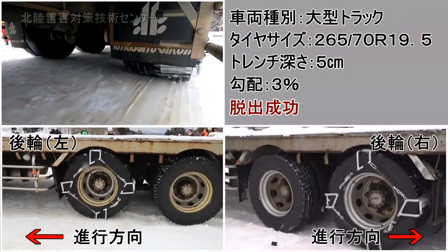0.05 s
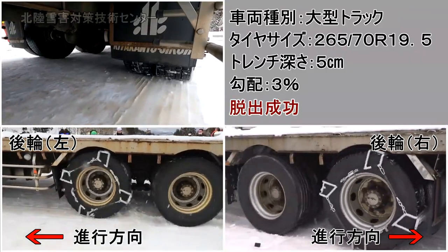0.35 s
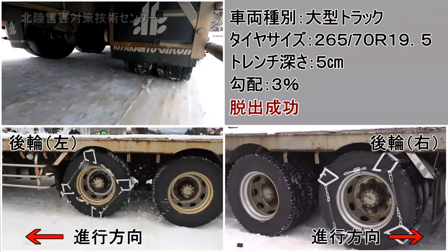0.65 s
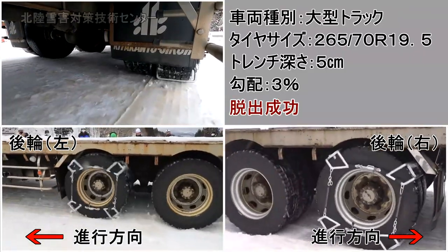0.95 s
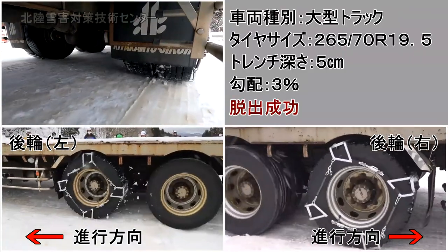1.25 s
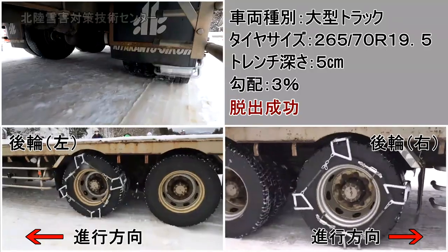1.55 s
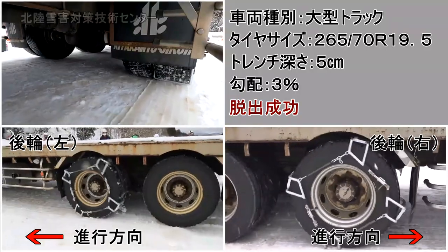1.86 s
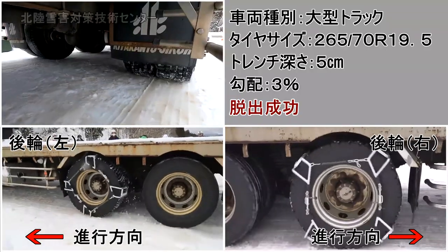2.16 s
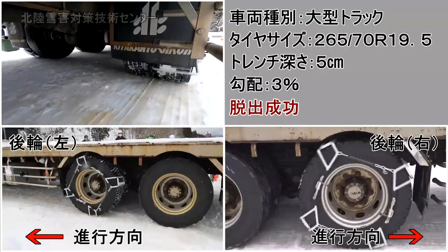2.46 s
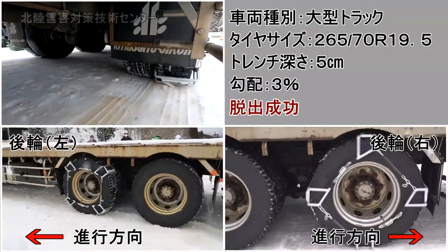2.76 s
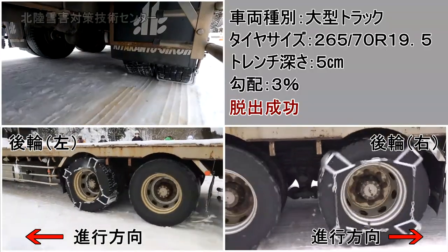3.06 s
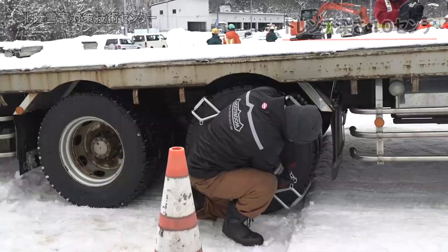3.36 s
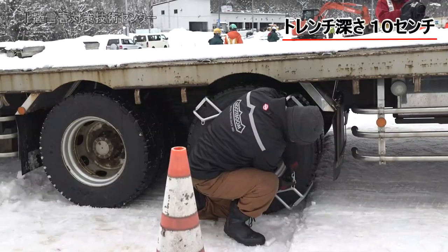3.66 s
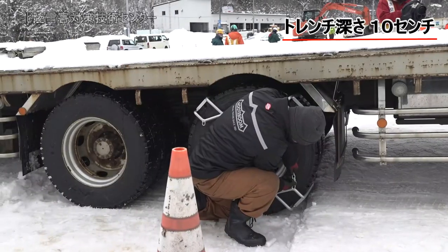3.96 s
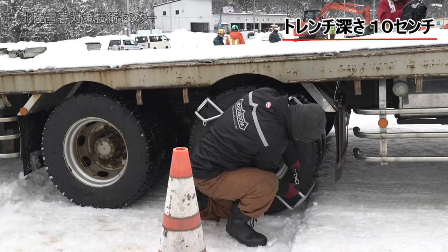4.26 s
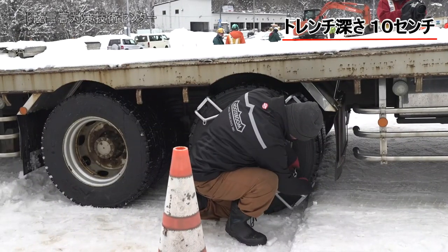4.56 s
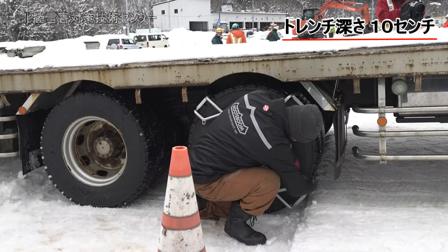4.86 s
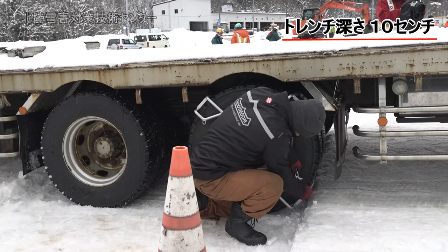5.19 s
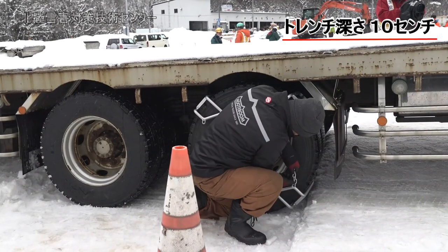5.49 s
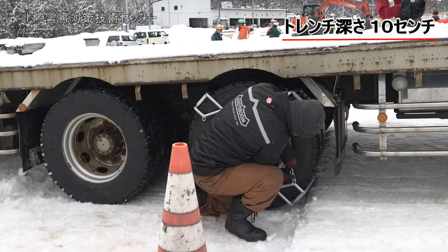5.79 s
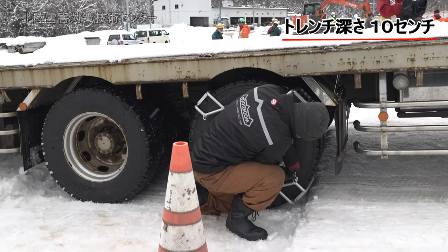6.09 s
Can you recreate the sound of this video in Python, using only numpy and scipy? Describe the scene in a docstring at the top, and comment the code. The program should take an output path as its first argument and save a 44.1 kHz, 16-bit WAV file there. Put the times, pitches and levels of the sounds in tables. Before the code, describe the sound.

Tire chains crunch, rattle and squeak on ice over engine rumble, giving way suddenly to a soft diesel idle and an air puff.

```python
"""Tyre chains grind and bite as a heavy truck's drive wheels spin in an icy rut. Crushed ice shakes the
wheel and rings the links, slipping steel squeals, snow sprays, and the labouring engine rumbles below.
Then, abruptly, the truck stands with its diesel idling: firings clatter in the block, a valve lets out
a puff of air, chain links tick as they are fastened, and two soft gusts of wind pass."""
import sys
import numpy as np
from scipy import signal
from scipy.fft import rfft, irfft, next_fast_len
from scipy.io import wavfile
from scipy.ndimage import uniform_filter1d, map_coordinates

SR = 44100
rng = np.random.default_rng(int(sys.argv[2]) if len(sys.argv) > 2 else 0)


def wrap_up_sound(samples):
    """Save the sound to the file named by the first command line argument, as 16-bit audio."""
    columns = np.atleast_2d(samples).T
    # keep every value between -1 and 1, then stretch to whole-number steps
    tamed = np.clip(columns, -1, 1)
    steps = np.round(tamed * 32767).astype(np.int16)
    wavfile.write(sys.argv[1], SR, steps)


N = 270333
TIME = np.arange(N) / SR


# Spectra of grinding, ice grit and snow spray: f/Hz, level/dB
GRIND_SPECTRUM = [(120, -36), (300, -18), (440, -7.5), (560, -1.5), (800, 0.5), (1150, 0), (1400, -5.5),
                  (1900, -11), (3000, -40), (8000, -53)]
GRIT_SPECTRUM = [(600, -28.5), (1200, -1.5), (1600, 0.5), (2100, -1.5), (2700, -2.5), (3300, -8.5),
                 (4400, -10), (5100, -14), (6200, -14.5), (8000, -32), (15000, -51)]
SPRAY_SPECTRUM = [(2000, -24), (4500, -2.5), (6300, -5.5), (8200, 0.5), (10500, -2.5), (12500, -4.5),
                  (15000, -0.5)]
# Modes of rim and bodywork, chain links, steel dragged over ice: f/Hz, width/Hz, level/dB
WHEEL_MODES = [(514, 15, -2.5), (589.5, 37, 3), (699, 39, 1), (862, 41, -3.5), (1104, 82, 0),
               (1540, 14, -11.5), (1727, 18, -7.5)]
LINK_MODES = [(2483, 56.6, 2), (2660, 23.3, 2), (2964, 56, -4.5), (3840, 215, -9.5), (4400, 189, -7),
              (6040, 150, -26)]
SCRAPE_MODES = [(7740, 150, 0.5), (9960, 450, -5), (12100, 670, -2.5), (13500, 390, -4)]

def chain_churn():
    """Chains crush ice: coarse grains shake the wheel, finer ones ring the links, powder sprays off."""
    grind_gain, grit_gain, spray_gain = bite_envelopes()
    coarse, fine = grains(per_s=3000, scatter_db=1.5), grains(per_s=4000, scatter_db=2.5)
    wheel = resonate(grains(per_s=3000, scatter_db=6), WHEEL_MODES)
    grind = coloured(coarse, GRIND_SPECTRUM) + amp(-4.5) * wheel
    clinks = link_jingle(count=1200, centre_hz=3000, log_spread=0.4, t60_s=0.05, scatter_db=3)
    links = resonate(grains(per_s=3100, scatter_db=4.5), LINK_MODES)
    metal = links + amp(-1) * coloured(clinks, GRIT_SPECTRUM)
    grit = coloured(fine, GRIT_SPECTRUM) + amp(-7) * metal
    scrape = resonate(grains(per_s=2500, scatter_db=4.5), SCRAPE_MODES)
    powder = unit(fine) + unit(grains(per_s=3500, scatter_db=3))
    spray = unit(coloured(powder, SPRAY_SPECTRUM) + amp(-2) * scrape)
    grind, grit, spray = [moving_contact(x, depth_db=2.5) for x in (grind, grit, spray)]
    # Flying ice and powder scatter widely: side signal.
    chips = amp(-15.5) * grit_gain * coloured(grains(per_s=4000, scatter_db=2), GRIT_SPECTRUM)
    dust = amp(-5) * spray_gain * coloured(grains(per_s=7000, scatter_db=2), SPRAY_SPECTRUM)
    side = (chips + dust) * np.array([[1], [-1]])
    crushing = grind_gain * grind + grit_gain * grit
    return pan(crushing, left_db=7.5) + pan(spray_gain * spray, left_db=7) + side


# Chain digs in: t/s, half length/s, level/dB, brightness/dB (low on packed ice, high in loose snow)
CHAIN_BITES = [(.055, 0.019, -41.5, 13), (0.221, 0.0088, -30, -9), (.254, 0.0088, -26.5, -12),
               (0.405, 0.0088, -33, 10), (.444, 0.017, -21, -5.5), (.481, 0.02, -23, -16),
               (.854, 0.0035, -35.5, -9), (.877, .007, -37.5, 8.5), (1.147, .022, -27.5, 2),
               (1.177, 0.012, -20.5, -5.5), (1.232, 0.029, -36, 14), (1.707, 0.03, -25.5, 5),
               (1.76, 0.029, -29.5, 12), (1.923, 0.038, -25.5, 7), (2.032, .04, -20, -3.5),
               (2.302, 0.027, -28.5, -7), (2.647, .006, -38, 4), (2.771, 0.0094, -29, -6.5),
               (3.09, .008, -47.5, 18.5), (3.19, 0.073, -31.5, -8), (3.234, 0.014, -38, 3.5),
               (3.322, 0.015, -41.5, 9)]
# Fine snow thrown between bites: t/s, level/dB
POWDER_LEVELS = [(0.0, -57), (0.32, -58), (0.8, -59.5), (1.68, -56), (1.88, -53.5), (2.07, -54),
                 (2.22, -62), (2.88, -61.5), (3.17, -53.5), (3.2, -53)]

def bite_envelopes():
    """Gains of grind, grit and spray: steady churn, a swell per bite, then drag through broken ice."""
    hard_bite_db, drag_rise_s = -20.5, 0.1
    grind_power, grit_power = amp(-36.5) ** 2, amp(-42) ** 2
    spray_power = amp(1 + np.interp(TIME, *np.transpose(POWDER_LEVELS))) ** 2
    for at_s, half_s, db, bright_db in CHAIN_BITES:
        bite = (amp(db) * swell(at_s, half_s, steepness=2.1)) ** 2
        age = np.maximum(TIME - at_s, 0) / drag_rise_s
        drag_db = -33 + 1.4 * (db - hard_bite_db)  # a harder bite leaves more to drag through
        drag = amp(drag_db) ** 2 * age * np.exp(1 - age)
        grind_power += bite + drag
        grit_power += bite * amp(-6 + 0.63 * bright_db) ** 2 + drag * amp(-14.5) ** 2
        spray_power += bite * amp(-23.5 + bright_db) ** 2
    return np.sqrt(grind_power), np.sqrt(grit_power), np.sqrt(spray_power)


def link_jingle(count, centre_hz, log_spread, t60_s, scatter_db):
    """Loose links clink together, each with its own pitch and strength."""
    t = np.arange(SR // 20) / SR
    starts = rng.integers(0, N, (count, 1))
    pitch, size = rng.standard_normal((2, count, 1))
    hz = np.minimum(centre_hz * np.exp(log_spread * pitch), SR / 2)
    rings = amp(scatter_db * np.minimum(size, 2) - 60 * t / t60_s) * np.sin(2 * np.pi * hz * t)
    samples = starts + np.arange(len(t))
    return unit(np.bincount(samples.ravel(), rings.ravel(), N)[:N])


def moving_contact(x, depth_db):
    """The moving contact point favours ever different resonances."""
    spectra = signal.stft(x, nperseg=1024)[2]
    field = rng.standard_normal(spectra.shape)
    for axis in (0, 1):
        field = uniform_filter1d(field, size=3, axis=axis)
    return unit(signal.istft(spectra * amp(depth_db * unit(field)), nperseg=1024)[1][:N])


# Steel slips on ice: t/s, half length/s, f/Hz, level/dB
STEEL_SLIPS = [(.302, 0.02, 4380, -46), (0.443, .025, 4480, -47), (.55, 0.01, 6200, -51.5),
               (1.033, 0.024, 4600, -44.5), (1.166, 0.023, 4340, -36.5), (1.245, 0.013, 4490, -36),
               (1.767, 0.019, 4505, -22.5), (1.84, 0.016, 4470, -36.5), (1.972, 0.012, 4470, -26),
               (2.145, 0.024, 4420, -38), (2.356, 0.038, 883, -27.5), (3.145, 0.016, 2432, -36.5)]

def chain_squeal():
    """Stick-slip locks onto one mode: a wavering, rasping tone with weak overtones."""
    out = np.zeros(N)
    waver, flutter = 0.0042 * wobble(330), unit(amp(3 * wobble(140)))
    rasp = amp(-17) * wobble(500)
    for at_s, half_s, hz, db in STEEL_SLIPS:
        grip = np.clip(amp(db + 32), 0.3, 1)  # firmer contact: steadier pitch, less rasp
        phase = 2 * np.pi * np.cumsum(hz * (1 + waver / grip)) / SR
        overtones = amp(-28) * np.sin(2 * phase) + amp(-28.5) * np.sin(3 * phase)
        tone = np.sin(phase) + rasp / grip * np.cos(phase) + grip * overtones
        out += amp(db) * swell(at_s, half_s, steepness=2.8) * np.sqrt(2) * tone
    return pan(out * flutter, left_db=7.5)


# Ice breaks under a link: t/s, level/dB
ICE_SNAPS = [(2.6488, -17), (.855, -25)]

def ice_cracks():
    """Ice snaps with a dull knock, a cycle or two long."""
    half_s, knock_hz = 0.0005, 900
    out = np.zeros(N)
    for at_s, db in ICE_SNAPS:
        out -= amp(db) * swell(at_s, half_s, steepness=2) * np.cos(2 * np.pi * knock_hz * (TIME - at_s))
    return pan(out, left_db=7.3)


# Spectra of the shaking truck, deep rumble and boom: f/Hz, level/dB
RUMBLE_SPECTRUM = [(10, -36.5), (19, -20.5), (26, 2.5), (36, 9.5), (47, -6), (65, -3.5), (90, -29.5),
                   (200, -49)]
BOOM_SPECTRUM = [(45, -9), (78, 7), (112, -0.5), (155, -5.5), (185, 2.5), (215, -4), (255, -2), (310, -9),
                 (500, -4), (1200, -56)]
# Tyre judders: t/s, half length/s, f/Hz, level/dB
TYRE_JUDDERS = [(0.347, 0.024, 108.3, -35), (1.43, 0.077, 181, -42), (1.895, 0.034, 112.7, -34),
                (2.387, 0.065, 184, -41.5)]

def chassis_rumble():
    """The loaded engine and the axle shake the chassis; the tyre judders briefly as it grips."""
    firing_hz = 47.1
    boom_db = -43 + 0.5 * wobble(9)
    firing = np.sin(2 * np.pi * np.cumsum(firing_hz * (1 + 0.033 * wobble(5))) / SR)
    drone = amp(-2 + 3.7 * wobble(16)) * np.sqrt(2) * firing
    shake = amp(-44.5) * unit(coloured(noise(), RUMBLE_SPECTRUM) + drone)
    shake += amp(boom_db) * coloured(noise(), BOOM_SPECTRUM)
    slip_time_s = np.cumsum(1 + 0.06 * wobble(35)) / SR
    for at_s, half_s, hz, db in TYRE_JUDDERS:
        shake += amp(db) * swell(at_s, half_s, steepness=4) * np.sin(2 * np.pi * hz * slip_time_s)
    return pan(shake, left_db=7.5)


# Modes of engine block and valve gear: f/Hz, width/Hz, level/dB
BLOCK_MODES = [(680, 130, -3), (1285, 170, -1.5), (1880, 70, -5), (2060, 108, -4.5), (2250, 140, 1.5),
               (2390, 96, -7), (3580, 290, -24), (4400, 450, -17.5), (5260, 111, -24)]
TAPPET_MODES = [(3650, 200, -3), (4500, 280, -5.5), (5500, 140, -7.5)]
# Broadband diesel noise: f/Hz, level/dB
DIESEL_SPECTRUM = [(24, -26), (50, -21), (110, -20.5), (230, -13.5), (400, -12), (550, -15.5), (720, -11.5),
                   (950, -16), (1500, -12), (2300, -13), (3100, -24), (5000, -38), (7500, -47),
                   (12500, -44.5), (14200, -39), (15000, -54)]
# Valve gear strikes: position/turn, level/dB
TAPPET_STRIKES = [(.535, -3), (.615, -13), (.76, -8)]
# Engine orders: multiple of crank rate, level/dB
CRANK_ORDERS = [(3, -77), (5, -83.5), (7, -85.5), (8, -81.5), (9, -78), (14, -79.5), (18, -80.5),
                (20, -78.5), (27, -88), (28, -74.5), (29, -78), (58, -77), (61, -78), (81, -76.5),
                (99, -74)]

def diesel_idle():
    """Two firings a turn clatter in the block and the valves tick, over engine orders and a hum."""
    crank_hz, hum_hz, tappet_t60_s = 22.5, 283, 0.018
    turns = crank_hz * TIME + 0.002 * wobble(3)
    angle = 2 * np.pi * turns
    firing_db = 2.3 * np.cos(2 * (angle - 2 * np.pi * 0.67)) + np.cos(angle - 2 * np.pi * 0.44)
    # Part of the clatter repeats every turn.
    repeated = amp(-8) * np.interp(turns % 1 * SR / crank_hz, np.arange(N), noise())
    knock = amp(firing_db) * (repeated + noise())
    clatter = amp(-66.5) * resonate(knock, BLOCK_MODES)
    clatter += amp(-63.5) * coloured(repeated + noise(), DIESEL_SPECTRUM)
    strikes = sum(amp(db - 60 * ((turns - at) % 1) / crank_hz / tappet_t60_s)
                  for at, db in TAPPET_STRIKES)
    ticks = amp(-83) * resonate(strikes * noise(), TAPPET_MODES)
    order_gain = amp(-3 + wobble(4.22))
    orders = sum(amp(db) * np.sin(k * angle + rng.uniform(0, 2 * np.pi)) for k, db in CRANK_ORDERS)
    hum_gain = amp(-69.5 + 0.77 * wobble(8.2))
    hum = np.sin(2 * np.pi * np.cumsum(hum_hz + 0.36 * wobble(3.94)) / SR)
    return pan(clatter + ticks + np.sqrt(2) * (order_gain * orders + hum_gain * hum), left_db=9.6)


# Escaping air: f/Hz, level/dB
PUFF_SPECTRUM = [(900, -28), (1600, -9.5), (2400, 0), (3000, -5.5), (4000, -13), (5500, -9), (8000, -17),
                 (12000, -11.5), (14500, -18), (16000, -35)]
# Valve outlet modes: f/Hz, width/Hz, level/dB
NOZZLE_MODES = [(1750, 340, -6), (2370, 120, 2), (3670, 400, -7.5), (6000, 600, -15), (11800, 2000, -22)]

def valve_puff():
    """The air valve opens, blows while its pressure sags, and shuts; the yard echoes."""
    open_s, attack_s, hold_s, sag_db_per_s = 3.61, 0.02, 0.081, 38
    shut_t60_s, echo_t60_s = 0.09, 0.73
    age_s = np.maximum(TIME - open_s, 0)
    shut_s = np.maximum(age_s - hold_s, 0)
    blowing = np.minimum(age_s / attack_s, 1) * amp(-52.5 - sag_db_per_s * age_s)
    release = np.hypot(amp(-60 * shut_s / shut_t60_s), amp(-6.5 - 60 * shut_s / echo_t60_s))
    hiss = unit(coloured(noise(), PUFF_SPECTRUM) + amp(4) * resonate(noise(), NOZZLE_MODES))
    return pan(blowing * release * hiss, left_db=9)


# Links touch during fastening: t/s, relative level/dB
LINK_TOUCHES = [(3.9744, -58), (4.0133, -63), (4.0866, -63.5), (4.4553, -65.5), (4.5002, -60), (4.557, -67),
                (4.843, -72), (5.075, -71), (5.5149, -59.5), (5.5444, -65)]
# Modes of one link: f/Hz, level/dB, t60/s
TICK_MODES = [(8160, -8, .03), (9740, -9, .03), (11920, 5, 0.023), (12500, -4, .035), (13300, -7, .03),
              (14100, -4, .03)]

def link_ticks():
    """Two links touch with a click and a short ring; their neighbours shiver on."""
    click_t60_s, shiver_t60_s = 0.041, 0.22
    out, t = np.zeros(N + SR), np.arange(SR // 5) / SR
    for at_s, db in LINK_TOUCHES:
        ring = np.zeros(len(t))
        for hz, mode_db, t60_s in TICK_MODES:
            decay = amp(mode_db + rng.normal(0, 2.95) - 60 * t / t60_s)
            ring += decay * np.sin(2 * np.pi * hz * rng.normal(1, 0.024) * t)
        click = amp(3 - 60 * t / click_t60_s) * bright_noise(len(t))
        shiver = amp(-6 - 60 * t / shiver_t60_s) * bright_noise(len(t))
        out[round(at_s * SR):][:len(t)] += amp(db - 13.5) * (amp(2) * ring + click + shiver)
    return pan(out[:N], left_db=8)


# Gusts: t/s, half length/s, level/dB
WIND_GUSTS = [(5.67, .07, -69), (6.11, .08, -64.5)]
# Wind buffeting: f/Hz, level/dB
WIND_SPECTRUM = [(20, -20.5), (45, -2.5), (60, 4), (85, -3.5), (150, -11), (400, -11.5), (1000, -53)]

def wind():
    """Two soft gusts buffet as low noise."""
    gusts = sum(amp(db) * swell(at_s, half_s, steepness=1.6) for at_s, half_s, db in WIND_GUSTS)
    return pan(gusts * coloured(noise(), WIND_SPECTRUM), left_db=6)


def amp(db):
    """Decibels to gain."""
    return 10 ** (np.asarray(db) / 20)


def unit(x):
    """Scale to rms 1."""
    return x / np.sqrt(np.mean(x ** 2) + 1e-20)


def noise():
    """White noise."""
    return rng.standard_normal(N)


def bright_noise(samples):
    """Noise rising 12 dB per octave."""
    return np.diff(rng.standard_normal(samples + 2), 2) / 2


def grains(per_s, scatter_db):
    """Tiny fractures: impulses of random time and size."""
    return (rng.random(N) < per_s / SR) * np.sign(noise()) * amp(scatter_db * noise())


def wobble(knots_per_s):
    """Smooth random curve."""
    return map_coordinates(rng.standard_normal(int(N * knots_per_s / SR) + 4), [TIME * knots_per_s])


def swell(middle_s, half_s, steepness):
    """Bell envelope, peak 1."""
    distance = np.abs((TIME - middle_s) / half_s)
    near = distance < 6
    out = np.zeros(N)
    out[near] = np.exp(-distance[near] ** steepness / 2)
    return out


def filtered(x, response):
    """Apply the gain response(f/Hz)."""
    size = next_fast_len(N + SR // 2)
    return irfft(rfft(x, size) * response(np.fft.rfftfreq(size, 1 / SR)), size)[..., :N]


def coloured(x, spectrum):
    """Shape x by (f/Hz, level/dB) points; rms 1."""
    hz, db = np.transpose(spectrum)
    return unit(filtered(x, lambda f: amp(np.interp(np.log(f + 1), np.log(hz), db))))


def resonate(x, modes):
    """Ring x in (f/Hz, width/Hz, level/dB) modes of alternating sign; rms 1."""
    def response(f):
        return sum((-1) ** k * amp(db) * 1j * f * width / (hz * hz - f * f + 1j * f * width)
                   for k, (hz, width, db) in enumerate(modes))
    return unit(filtered(x, response))


def pan(x, left_db):
    """Stereo pair, left louder by left_db."""
    ratio = amp(left_db)
    return np.array([ratio * x, x]) * 2 / (1 + ratio)


def scene():
    """The spinning wheels give way at once to the standing truck."""
    stop_s, fade_s = 3.335, 0.001
    spinning = np.clip((stop_s - TIME) / fade_s, 0, 1)
    wheels = chain_churn() + chassis_rumble() + chain_squeal() + ice_cracks()
    standing = diesel_idle() + valve_puff() + wind() + link_ticks()
    return spinning * wheels + (1 - spinning) * standing


def record(dry):
    """Steep low-pass."""
    cutoff_hz = 15200
    return filtered(dry, lambda hz: 1 / (1 + (hz / cutoff_hz) ** 160))


dry = scene()
out = record(dry)
wrap_up_sound(out)
```